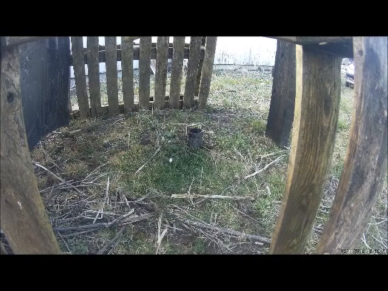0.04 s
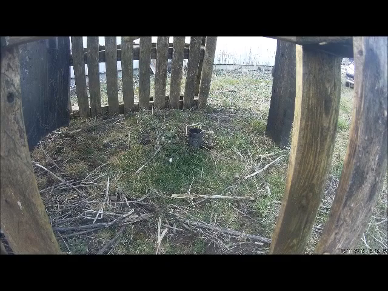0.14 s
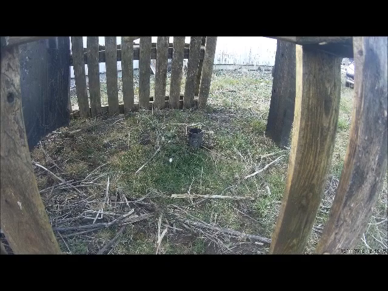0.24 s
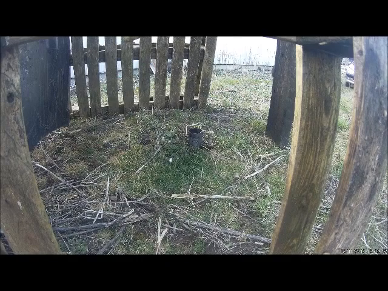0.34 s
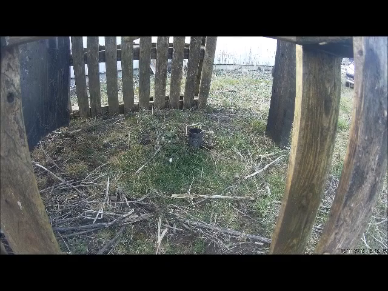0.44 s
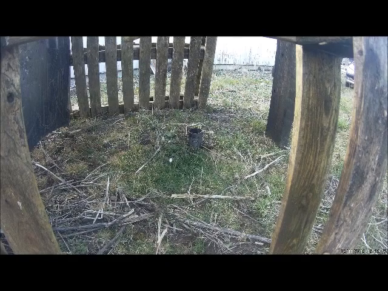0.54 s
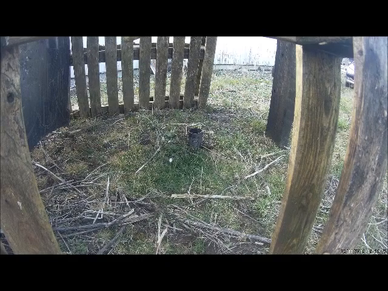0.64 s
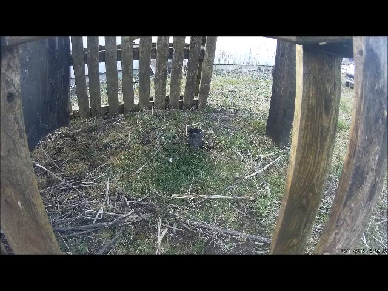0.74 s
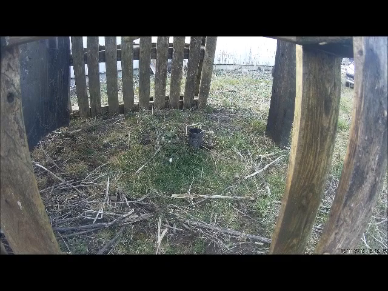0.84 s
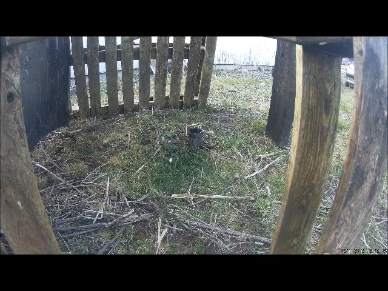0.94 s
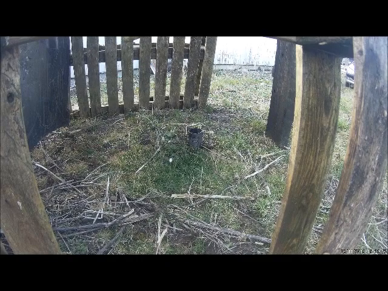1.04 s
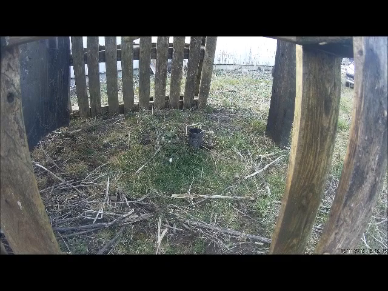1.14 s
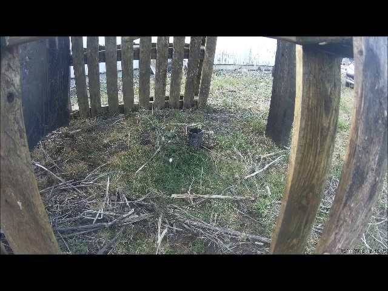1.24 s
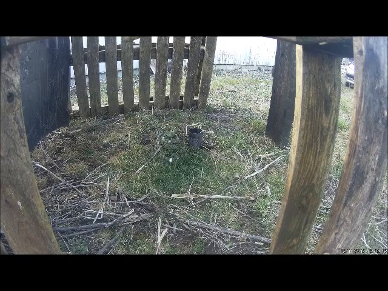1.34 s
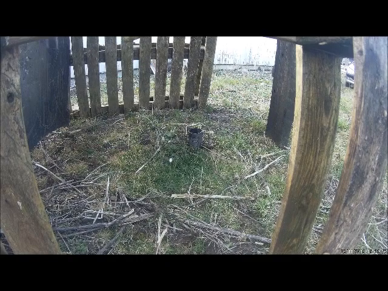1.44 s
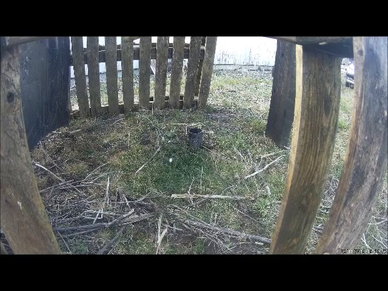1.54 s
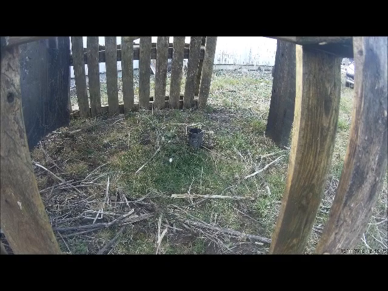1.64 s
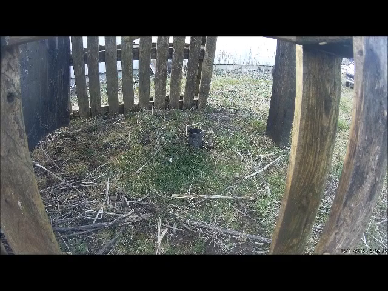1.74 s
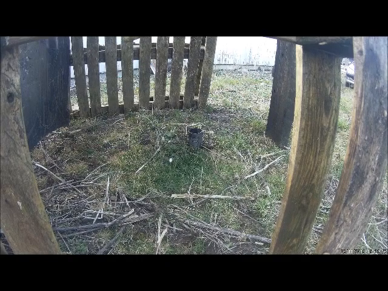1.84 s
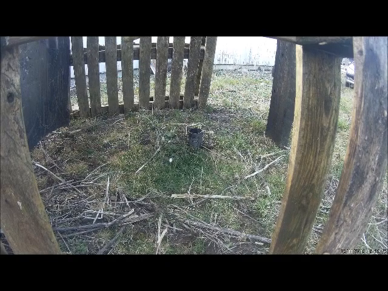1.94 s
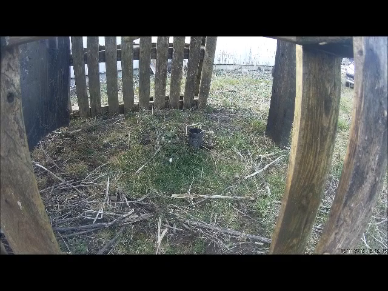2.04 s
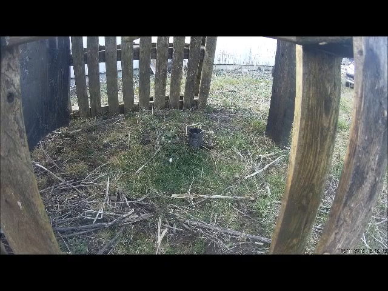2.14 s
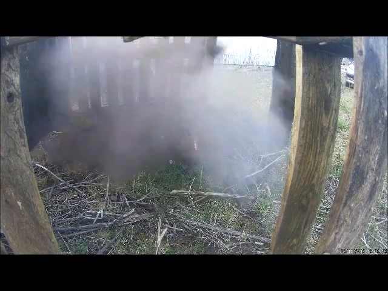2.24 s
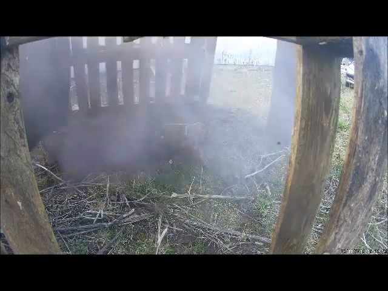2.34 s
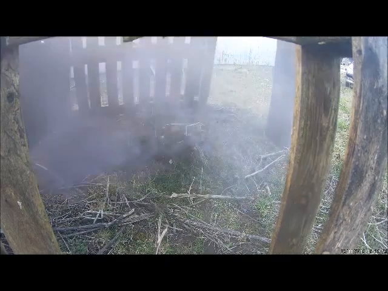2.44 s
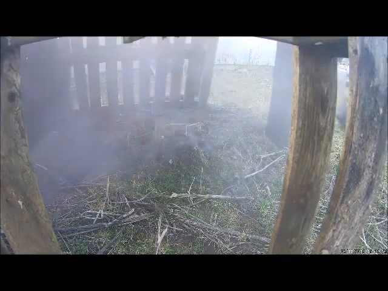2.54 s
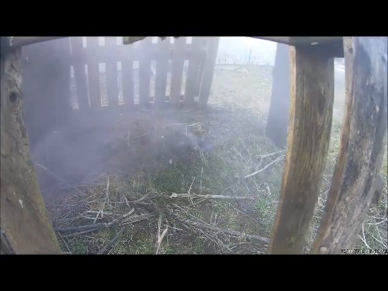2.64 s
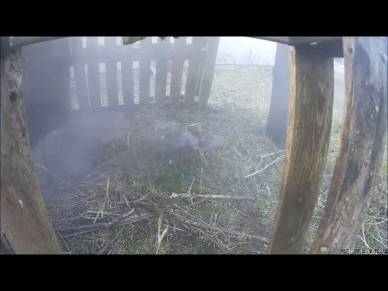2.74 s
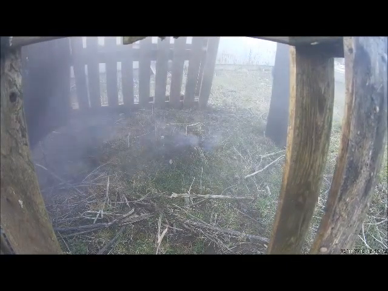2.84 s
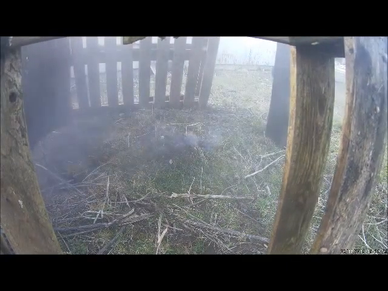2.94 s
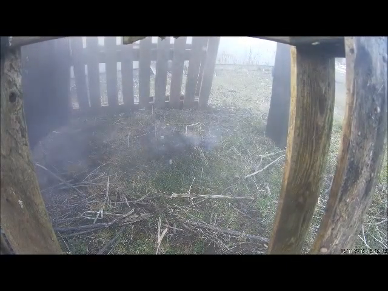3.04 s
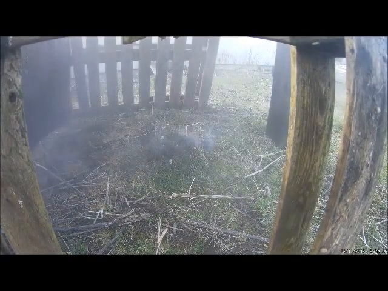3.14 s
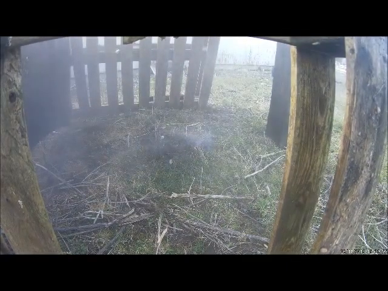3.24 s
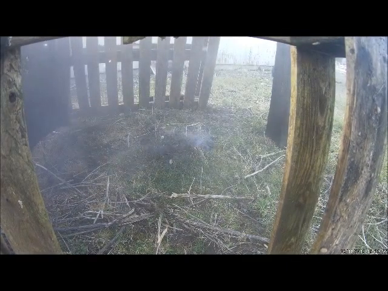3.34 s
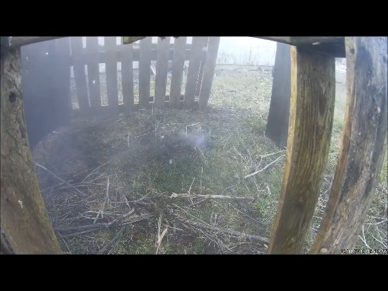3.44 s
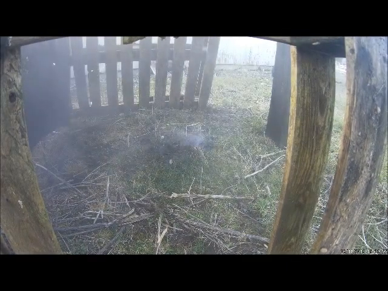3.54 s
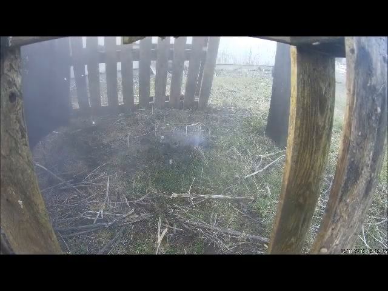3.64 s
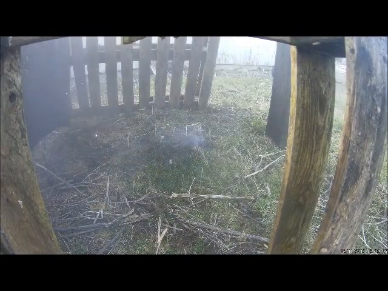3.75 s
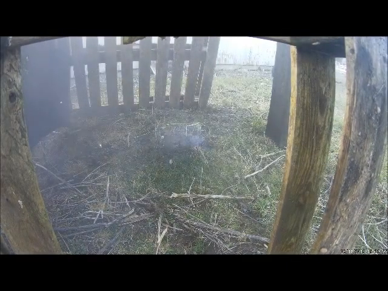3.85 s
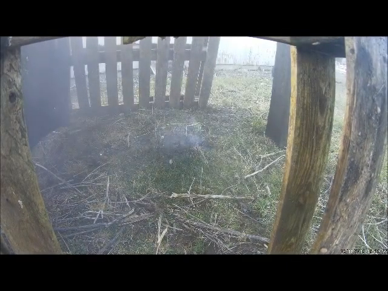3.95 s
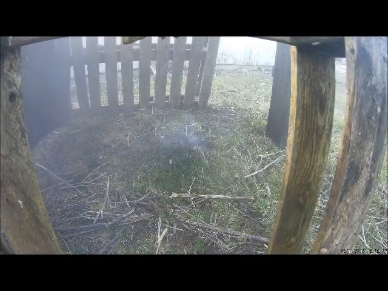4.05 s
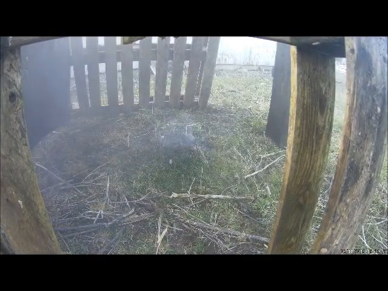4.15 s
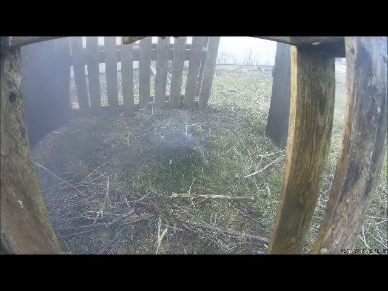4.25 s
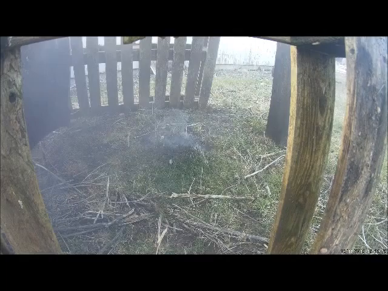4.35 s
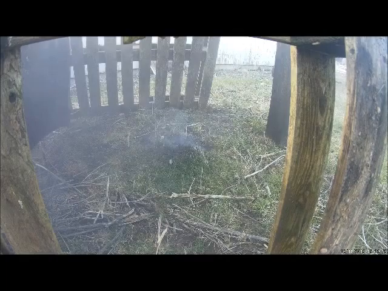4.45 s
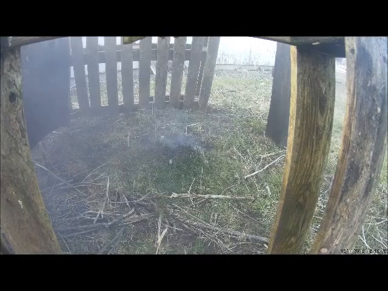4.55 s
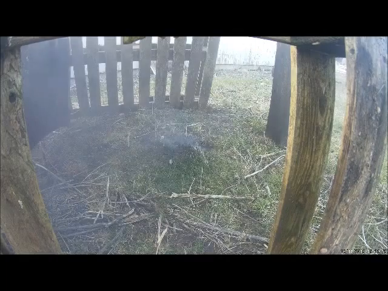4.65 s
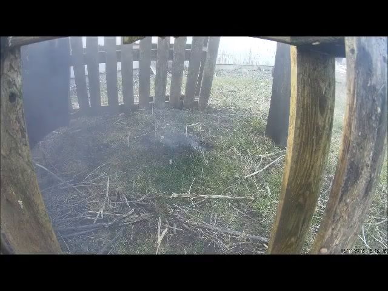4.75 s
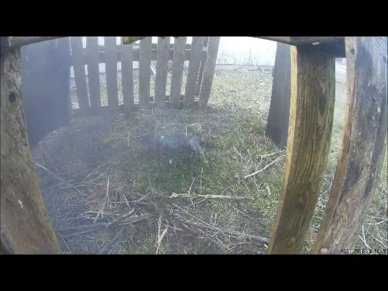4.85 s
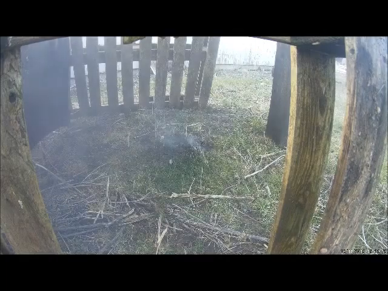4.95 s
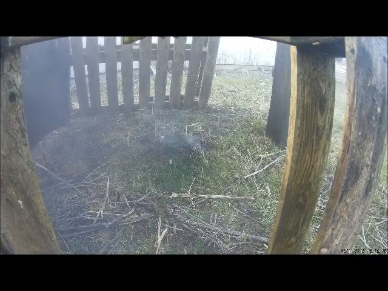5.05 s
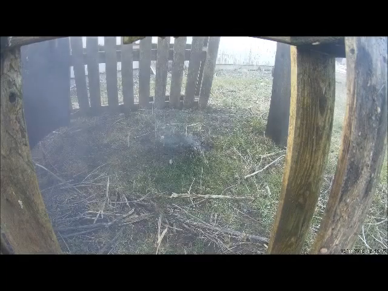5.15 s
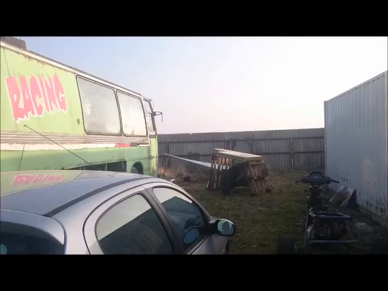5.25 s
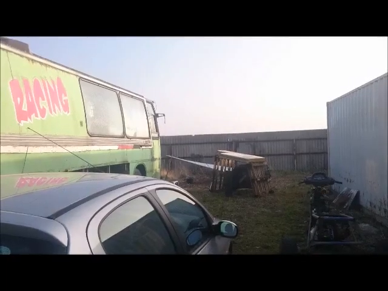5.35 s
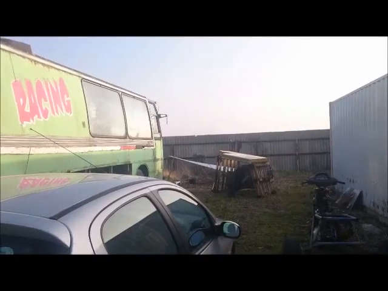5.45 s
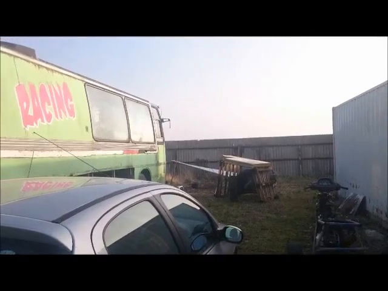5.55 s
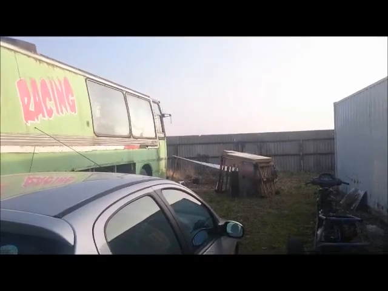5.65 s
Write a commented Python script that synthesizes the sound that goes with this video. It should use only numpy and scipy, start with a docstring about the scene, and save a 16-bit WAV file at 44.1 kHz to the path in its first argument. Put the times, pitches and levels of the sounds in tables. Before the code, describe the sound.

Inside a pen of wooden pallets, a cased camera hisses and whines faintly for two seconds. A charge explodes very close: a sharp crack and harsh overloaded roar, cut off quickly. Dull echoes return while the wooden frame booms, sways and rattles. Debris knocks on wood, grit ticks on the case, and later a small puff of wind bumps. Finally it cuts abruptly to a faint humming yard.

```python
"""Inside a pen of wooden pallets, a small charge goes off a step from a camera in a closed case.
The blast, a short shock and a noise roar, is so loud that it clips; dull noise echoes return from walls.
The frame booms, sways and rattles (sagging tones and noise); debris knocks on wood and grit ticks on the case.
A puff of wind follows, over the camera's hiss and whine.
At the end the sound cuts to the yard, where a machine hums (steady tones) over a hiss."""
import sys
import numpy as np
from scipy import signal
from scipy.fft import rfft, irfft
from scipy.io import wavfile

SR = 44100
rng = np.random.default_rng(int(sys.argv[2]) if len(sys.argv) > 2 else 0)


def wrap_up_sound(samples):
    """Save the sound to the file named by the first command line argument, as 16-bit audio."""
    columns = np.atleast_2d(samples).T
    # keep every value between -1 and 1, then stretch to whole-number steps
    tamed = np.clip(columns, -1, 1)
    steps = np.round(tamed * 32767).astype(np.int16)
    wavfile.write(sys.argv[1], SR, steps)


N = 250919

BLAST_S, CUT_S = 2.2905, 5.335   # seconds: the charge goes off, the sound cuts to the yard
ROAR_HOLD_S = 0.067   # the roar stays strong this long before its main decay


def from_db(db):
    """Turn decibels into a gain."""
    return 10 ** (np.asarray(db) / 20)


def since(start_s):
    """Seconds after a moment (0 before it), and a switch that opens there."""
    t = np.arange(N) / SR - start_s
    return np.maximum(t, 0), t >= 0


def at_hz(points, hz):
    """Read a level between the points of a table, on a logarithmic frequency axis."""
    table = np.array(points)
    return np.interp(np.log(hz), np.log(table[:, 0]), table[:, 1])


def butter(x, hz, kind, order=2):
    """Filter a sound with a Butterworth filter."""
    safe_hz = np.clip(hz, 10, SR / 2.2)
    return signal.sosfilt(signal.butter(order, safe_hz, kind, fs=SR, output="sos"), x)


def coloured(spectrum):
    """Make steady noise of a given spectrum, with rms 1."""
    hz = np.maximum(np.fft.rfftfreq(N, 1 / SR), 1)
    white_spectrum = rfft(rng.standard_normal(N))
    noise = irfft(white_spectrum * from_db(at_hz(spectrum, hz)), N)
    return noise / noise.std()


def band_noise(low_hz, high_hz):
    """Make noise in one band, with rms 1."""
    noise = butter(rng.standard_normal(N), [low_hz, high_hz], "band")
    return noise / noise.std()


def swell(start_s, peak_s):
    """Rise from a moment to 1, peak_s seconds later, and die away again."""
    t = since(start_s)[0] / peak_s
    return t * np.exp(1 - t)


def add(out, start_s, x):
    """Mix a short sound in at a moment."""
    i = round(start_s * SR)
    out[i:i + len(x)] += x[:N - i]


def shock():
    """The pressure jumps up, falls in a straight line to as far below zero, and jumps back: an N shape."""
    length_ms, level_db = 1.2, 21
    t, on = since(BLAST_S)
    n_shape = 1 - 2000 * t / length_ms
    return from_db(level_db) * on * (t < length_ms / 1000) * n_shape


def roar_level():
    """The roar holds, then dies in three stages that overlap: fireball, pen, yard."""
    # Each row: level in dB, loss after the hold in dB per second
    stages = [(15.5, 910), (-2, 300), (-13, 100)]
    flutter_db, flutter_hz = 1.5, 150   # ragged loudness: rms swing, fastest wobble
    t, on = since(BLAST_S)
    after_hold = np.maximum(t - ROAR_HOLD_S, 0)
    level = sum(from_db(db - loss * after_hold) for db, loss in stages)
    return on * level * from_db(flutter_db * band_noise(10, flutter_hz))


def roar_bands():
    """Noise in third-octave bands, where some bands die faster than others."""
    # Colour of the roar at its start. Each row: frequency in Hz, relative level in dB per Hz
    start_colour = [(100, -11), (300, -2), (800, -5.5), (1500, -5.5), (2100, -9), (2900, -3), (4000, -6),
                    (5000, -8), (6000, -4.5), (8000, -5), (11000, -15), (15000, -16.5)]
    # Extra loss on top of the shared decay. Each row: frequency in Hz, loss in dB per second
    extra_loss = [(100, 87), (400, 50), (1000, 45), (1600, 18), (2500, 27), (4000, 17), (6000, 44),
                  (8000, 56), (11000, 180), (15000, 100)]
    t, _ = since(BLAST_S)
    white = rng.standard_normal((2, N))   # neighbouring bands take turns, so they do not move together
    edges = 70 * 2 ** np.arange(0, 8.1, 1 / 3)
    out = np.zeros(N)
    for k, (low, high) in enumerate(zip(edges, edges[1:])):
        hz = np.sqrt(low * high)
        level_db = at_hz(start_colour, hz) - t * at_hz(extra_loss, hz)
        out += from_db(level_db) * butter(white[k % 2], [low, high], "band")
    return out


def roar_slide():
    """A tone roughened by slow noise slides upward during the hold, then fades."""
    # One row: start pitch in Hz, end pitch in Hz, top of the roughening noise in Hz, relative level in dB
    slide = (3400, 4350, 250.5, -17)
    fade_s = 0.012   # time to fall to about a third
    from_hz, to_hz, width_hz, level_db = slide
    t, _ = since(BLAST_S)
    pitch = from_hz + (to_hz - from_hz) * np.minimum(t / ROAR_HOLD_S, 1)
    tone = np.sin(2 * np.pi * np.cumsum(pitch) / SR)
    fade = np.exp(-np.maximum(t - ROAR_HOLD_S, 0) / fade_s)
    return from_db(level_db) * fade * band_noise(10, width_hz) * tone


def echoes():
    """Walls further off send back dull bursts of noise that die away."""
    # Each row: start in seconds, noise level before dulling in dB, dull above this Hz,
    # time to fall by 60 dB in seconds
    wall_echoes = [(2.408, -4, 1710, 0.085), (2.459, -24.5, 2700, 0.14), (2.575, -23, 800, 0.07),
                   (2.625, -36, 600, .15), (2.729, -48.5, 3020, 0.22), (2.774, -48, 1480, .08)]
    out, t = np.zeros(N), np.arange(SR // 2) / SR
    for start_s, level_db, dull_hz, t60 in wall_echoes:
        front = 1 - np.exp(-t / .003)      # a rough wall smears the front
        burst = rng.standard_normal(len(t)) * front * from_db(level_db - 60 * t / t60)
        add(out, start_s, butter(burst, dull_hz, "low", order=4))
    return out


def blast():
    """The charge gives a shock and a roar, and echoes follow."""
    return shock() + roar_level() * (roar_bands() + roar_slide()) + echoes()


def case(x):
    """The air in the camera case rings at a few pitches, added to the direct sound."""
    # Each row: pitch in Hz, width in Hz, level over the direct path in dB
    air_modes = [(1558, 190, 19.5), (3505, 150, 0.5), (4010, 500, 9), (5916, 400, 9), (11830, 1900, 8.5)]
    out = x.copy()
    for hz, width_hz, gain_db in air_modes:
        r = np.exp(-np.pi * width_hz / SR)
        b = [(1 - r * r) / 2, 0, -(1 - r * r) / 2]
        a = [1, -2 * r * np.cos(2 * np.pi * hz / SR), r * r]
        out += from_db(gain_db) * signal.lfilter(b, a, x)
    return out


def frame():
    """Each jolt rocks the frame: a sagging boom, a slower sway, loose rumble and a rattle of boards."""
    # Each row: start in seconds, length in seconds, boom pitch at the start in Hz,
    # then starting levels in dB: boom, sway, board rattle
    jolts = [(2.403, 0.017, 102, -11.5, -15.5, -15.5), (2.426, 0.059, 99.5, -10.5, -26, -21),
             (2.496, 0.083, 95.3, -13.5, -31, -32), (2.584, 0.074, 90, -10.5, -22, -29.5),
             (2.672, 0.046, 96.2, -13.5, -23, -33.5), (2.727, 0.039, 97.7, -19, -19, -46),
             (2.774, .065, 95.5, -22, -40, -58), (2.865, 0.079, 94.4, -32, -47, -64),
             (3.004, 0.1, 115, -34.5, -22.5, -65), (3.191, 0.17, 102, -42.5, -47, -70),
             (3.392, 0.11, 100, -47.5, -46.5, -70)]
    rise_s, stop_s = 0.015, 0.011   # a swing builds up, and is damped at its end
    boom_t60_s, sway_t60_s, rattle_t60_s = .7, .4, 0.18   # times to fall by 60 dB
    boom_sag_hz_per_s = 65
    sway_hz, sway_rise_hz_per_s = 47.3, 32   # later jolts sway faster: the frame stiffens as it settles
    loose_db, short_boards_db = -8.5, -6   # against the noise level of 0 dB
    rattle_rise_s = 0.0032   # boards speak faster than the frame
    loose = from_db(loose_db) * band_noise(75, 130)
    boards = band_noise(190, 270) + from_db(short_boards_db) * band_noise(300, 730)
    first_s = jolts[0][0]
    out, t = np.zeros(N), np.arange(SR // 2) / SR
    for start_s, length_s, hz, boom_db, sway_db, rattle_db in jolts:
        i = round(start_s * SR)
        now = slice(i, i + len(t))
        build_up = 1 - np.exp(-(t / rise_s) ** 2)
        swing = build_up * np.exp(-np.maximum(t - length_s, 0) / stop_s)

        boom_cycles = (hz - boom_sag_hz_per_s * t / 2) * t   # half the sag: cycles add up the falling pitch
        boom = np.sqrt(2) * np.sin(2 * np.pi * boom_cycles) + loose[now]
        boom *= from_db(boom_db - 60 * t / boom_t60_s)

        pitch = sway_hz + sway_rise_hz_per_s * (start_s - first_s)
        sway = np.sqrt(2) * np.sin(2 * np.pi * pitch * t)
        sway *= from_db(sway_db - 60 * t / sway_t60_s)
        add(out, start_s, swing * (boom + sway))

        rattle = from_db(rattle_db - 60 * t / rattle_t60_s) * boards[now]
        add(out, start_s, (1 - np.exp(-t / rattle_rise_s)) * rattle)
    return out


def deep_rumble():
    """Very low noise swells up below the boom and dies away."""
    start_s, peak_s, level_db = 2.39, .22, -26.5   # start, time to its top, rms level there
    return from_db(level_db) * swell(start_s, peak_s) ** 2 * band_noise(29, 46)


def knocks():
    """Each piece of debris strikes the same wood modes; its contact excites only part of them."""
    # Each row: time in seconds, click level before filtering in dB,
    # lowest and highest Hz that the contact excites
    strikes = [(2.662, -34.5, 995, 1800), (2.6818, -19.5, 790, 1370), (3.175, -42, 400, 600),
               (3.2644, -31, 420, 2400), (3.2682, -29, 1137, 3800), (3.271, -28, 182, 345),
               (3.403, -42, 150, 350)]
    # Each row: pitch in Hz, relative level in dB, time to fall by 60 dB in seconds
    wood_modes = [(242, 0, 0.083), (286, -2, 0.049), (493, 3.5, 0.042), (640, -12, 0.056), (965, -22, .06),
                  (1070, -6, 0.02), (1200, -8.5, 0.037), (1560, -4, 0.054), (1615, -11.5, 0.071),
                  (2180, -10.5, 0.019), (2510, -22, .02), (3460, -17, .04)]
    clicks = np.zeros(N) + 1e-18   # a tiny offset, far too faint to hear
    for start_s, level_db, low_hz, high_hz in strikes:
        click = from_db(level_db) * (np.arange(N) == round(start_s * SR))
        clicks += butter(click, [low_hz, high_hz], "band", order=3)
    out = np.zeros(N)
    for hz, level_db, t60 in wood_modes:
        r = from_db(-60 / (t60 * SR))   # what remains of the ringing after one sample
        w = 2 * np.pi * hz / SR
        ringing = signal.lfilter([0, np.sin(w)], [1, -2 * r * np.cos(w), r * r], clicks)
        out += from_db(level_db) * ringing
    return out


def grit():
    """Grains hit the case: each gives a click and a short scrape of fading noise in one band."""
    # Each row: time in seconds, scrape level before filtering in dB, lowest Hz, highest Hz,
    # time to fall by 60 dB in seconds
    grains = [(2.4619, -28, 9500, 15500, 0.0093), (2.595, -52, 9000, 13000, 0.014),
              (2.682, -39, 1390, 2500, 0.034), (2.729, -48.5, 5000, 8000, .06),
              (2.74, -49, 10000, 12000, .015), (2.84, -44.5, 5000, 8000, 0.012),
              (2.884, -45.5, 1300, 7500, 0.026), (3.066, -45, 3700, 4500, 0.012),
              (3.142, -48, 5000, 7000, 0.017), (3.1897, -38.5, 4010, 4200, .03),
              (3.7446, -33.5, 8500, 13000, 0.005), (3.7438, -30, 1450, 2800, 0.004)]
    first_contact = 3.8   # height of the click against the rms of its scrape
    out, t = np.zeros(N), np.arange(SR // 8) / SR
    for start_s, level_db, low_hz, high_hz, t60 in grains:
        scrape = rng.standard_normal(len(t))
        click = first_contact * (t == 0)
        tick = (scrape + click) * from_db(level_db - 60 * t / t60)
        add(out, start_s, butter(tick, [low_hz, high_hz], "band"))
    return out


def gust():
    """A puff of wind on the case is low, lumpy noise that swells and dies away."""
    # One row: start in seconds, rms level at the top in dB
    puff = (4.62, -49)
    start_s, level_db = puff
    rise_s = 0.048
    return from_db(level_db) * swell(start_s, rise_s) * band_noise(40.0, 92)


def camera():
    """The camera's electronics give a steady hiss and a high whine of pure tones."""
    # Each row: frequency in Hz, relative level in dB per Hz
    hiss_colour = [(12, -9.5), (20, 0.5), (144, -5), (213, -9), (392, -13), (700, -16.5), (1100, -19.5),
                   (3740, -24), (9000, -25), (14500, -25), (15600, -27)]
    # Each row: pitch in Hz, rms level in dB
    whine_tones = [(7074, -73), (14142, -57)]
    hiss_db = -50.5   # rms
    t = np.arange(N) / SR
    whine = sum(np.sqrt(2) * from_db(db) * np.sin(2 * np.pi * hz * t) for hz, db in whine_tones)
    return from_db(hiss_db) * coloured(hiss_colour) + whine


def machine_hum():
    """A machine in the yard hums: steady tones, each starting anywhere in its cycle."""
    # Each row: pitch in Hz, rms level in dB
    hum_tones = [(91.5, -71), (177.6, -66), (269.2, -68), (360.7, -61), (446.8, -63), (516.8, -71),
                 (538.3, -65), (581.4, -70), (629.8, -68)]
    t, _ = since(CUT_S)
    out = np.zeros(N)
    for hz, db in hum_tones:
        out += np.sqrt(2) * from_db(db) * np.sin(2 * np.pi * (hz * t + rng.random()))
    return out


def yard_hiss():
    """Distant noise grows fainter, and duller as a low-pass filter moves down."""
    # Each row: frequency in Hz, relative level in dB per Hz
    distant_colour = [(20, -23.5), (60, -6), (130, -14), (200, -9.5), (400, -7.5), (700, -6.5), (1100, -5),
                      (3000, -21), (8000, -40)]
    level_db, fade_db_per_s = -55.5, 15   # rms level at the cut, before dulling
    top_hz, dull_oct_per_s = 2300, 3.2
    t, _ = since(CUT_S)
    hiss = from_db(level_db - fade_db_per_s * t) * coloured(distant_colour)
    # the moving low-pass is a crossfade along a row of fixed ones
    steps = np.geomspace(900, 3000, 6)
    top_octave = np.log2(top_hz) - dull_oct_per_s * t
    place = np.interp(top_octave, np.log2(steps), np.arange(6))
    out = np.zeros(N)
    for k, hz in enumerate(steps):
        share = np.clip(1 - abs(place - k), 0, 1)
        out += share * butter(hiss, hz, "low", order=6)
    return out


def yard():
    """From the cut on: machine hum, distant hiss and faint steady air noise."""
    # Each row: frequency in Hz, relative level in dB per Hz
    air_colour = [(880, -30), (1500, -2.5), (3380, -7), (4480, -16), (7280, -11), (11000, -19),
                  (14000, -21)]
    air_db = -71   # rms
    _, on = since(CUT_S)
    return on * (machine_hum() + yard_hiss() + from_db(air_db) * coloured(air_colour))


def scene():
    """The pen is heard up to the cut, the yard after it."""
    through_case = case(blast() + grit())
    pen = through_case + frame() + deep_rumble() + knocks() + gust() + camera()
    _, after_cut = since(CUT_S)
    return (pen * ~after_cut + yard())[None]


def record(dry):
    """The converter clips hard, then a steep low-pass removes the top."""
    clip_height, cutoff_hz = .92, 15900   # 60 dB down from the cutoff upward
    low_pass = signal.cheby2(16, 60, cutoff_hz, fs=SR, output="sos")
    return signal.sosfilt(low_pass, np.clip(dry, -clip_height, clip_height))


dry = scene()
out = record(dry)
wrap_up_sound(out)
```